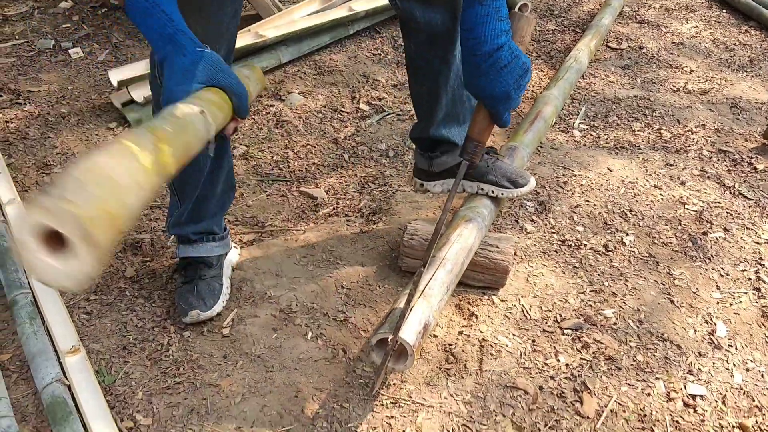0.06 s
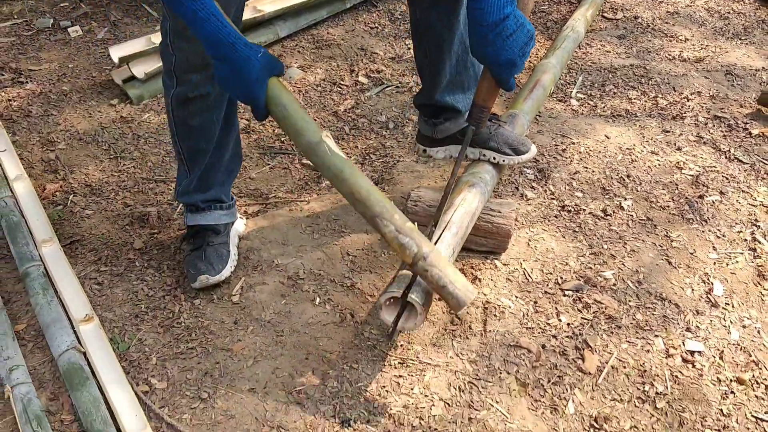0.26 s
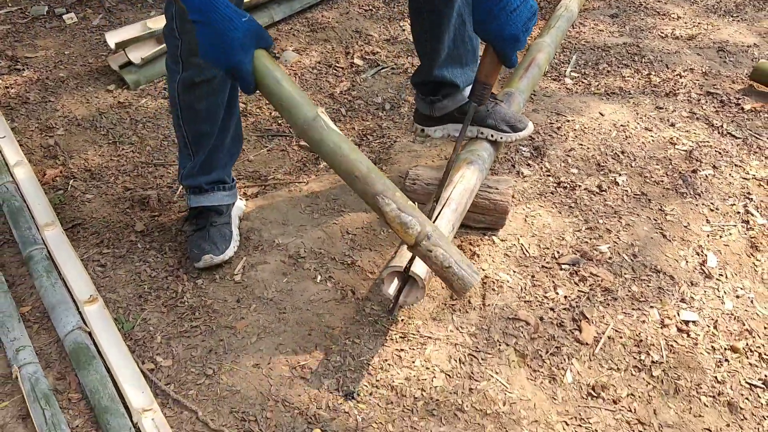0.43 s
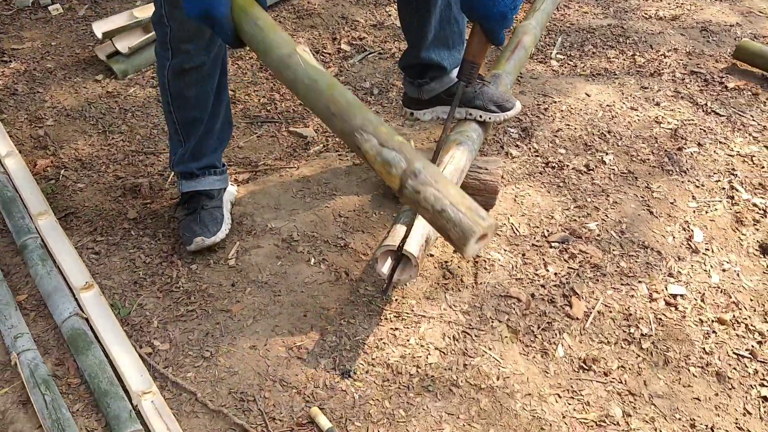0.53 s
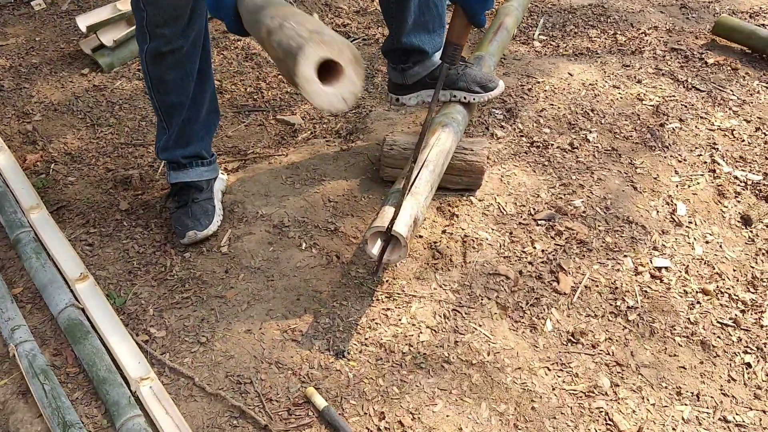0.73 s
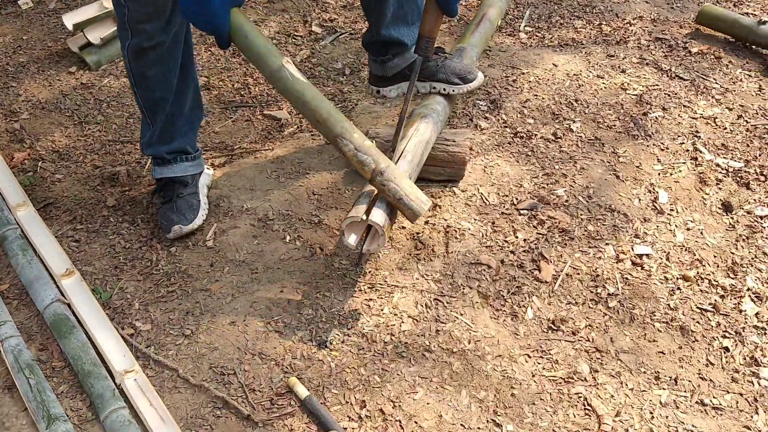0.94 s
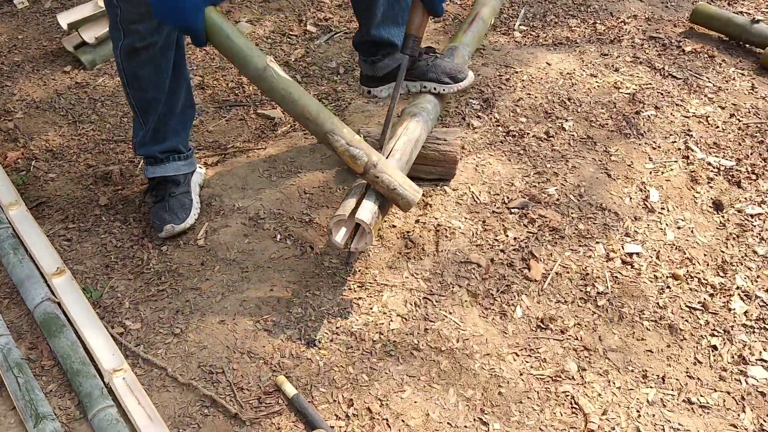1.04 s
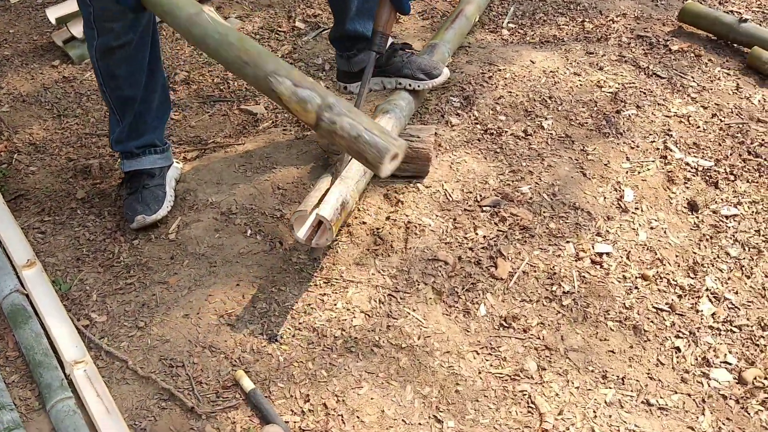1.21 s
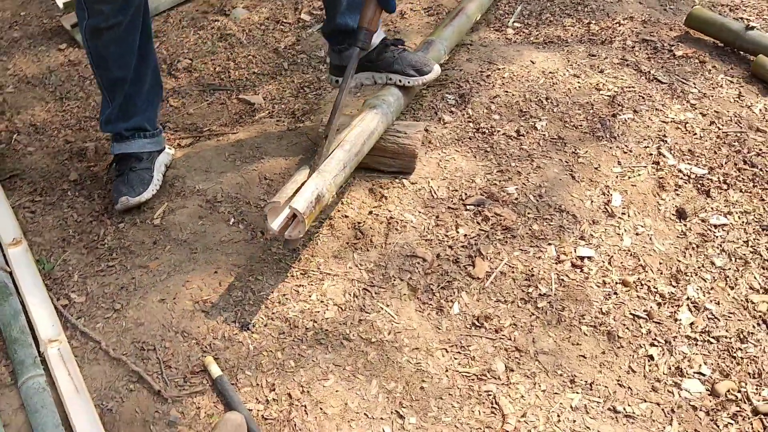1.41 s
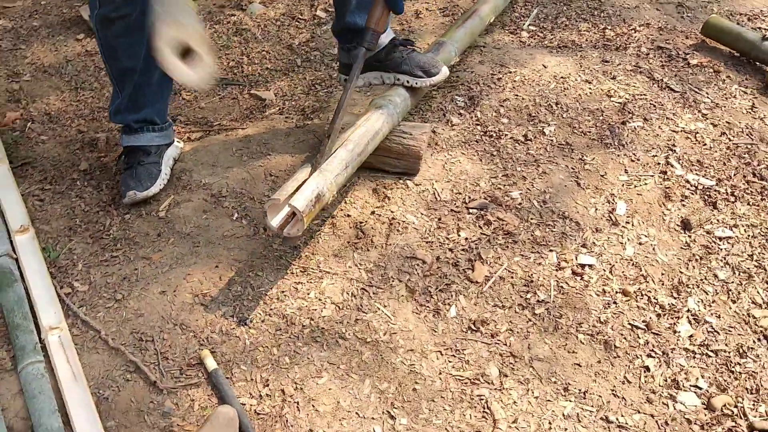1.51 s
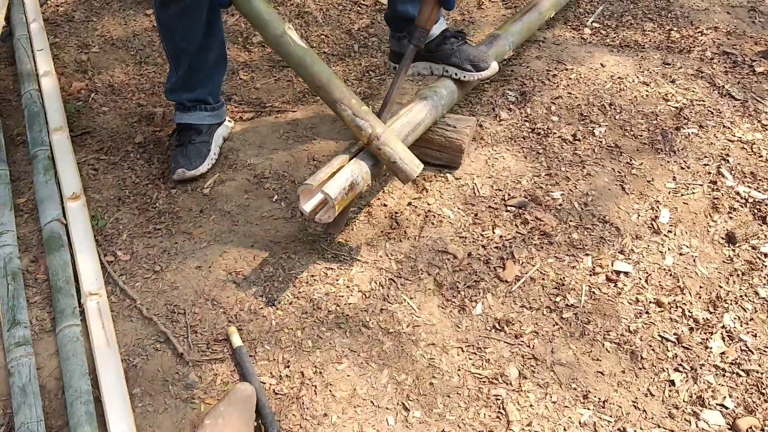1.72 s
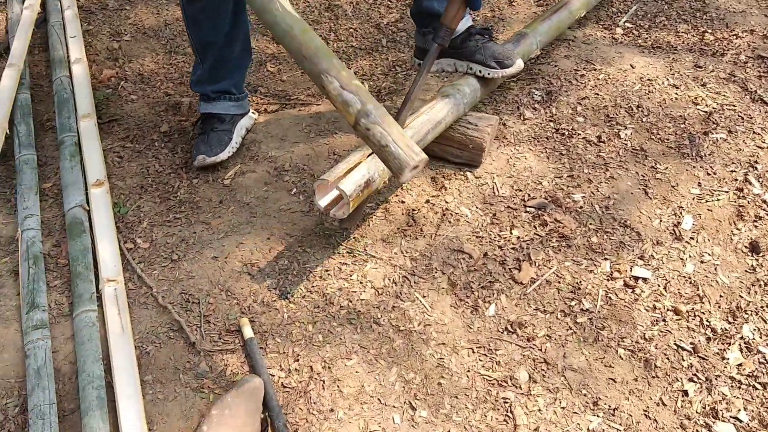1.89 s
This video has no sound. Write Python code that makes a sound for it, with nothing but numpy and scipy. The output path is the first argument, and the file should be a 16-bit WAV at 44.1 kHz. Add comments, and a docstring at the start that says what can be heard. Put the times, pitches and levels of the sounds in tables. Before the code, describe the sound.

Three hard, woody knocks with cracking fibres as bamboo is split outdoors.

```python
"""A bamboo club strikes three times on a blade wedged in a bamboo pole that lies on dry ground.
Each blow cracks the fibres, makes club, blade and pole ring, and thumps the ground; after the first
two the club bounces lightly. The surroundings throw the knocks back. In between, split fibres tick,
the pole bumps and squeaks, and dry litter rustles over quiet outdoor air."""
import sys
import numpy as np
from scipy import signal
from scipy.fft import rfft, irfft, next_fast_len
from scipy.io import wavfile
from scipy.ndimage import map_coordinates

SR = 44100
rng = np.random.default_rng(int(sys.argv[2]) if len(sys.argv) > 2 else 0)


def wav_out(sig):
    """Save sig, one row per channel (or a flat mono array), as 16-bit PCM at SR to the path in sys.argv[1]."""
    wavfile.write(sys.argv[1], SR, np.round(np.clip(np.atleast_2d(sig).T, -1, 1) * 32767).astype(np.int16))


N = 85995

# Levels are relative. A "colour" says how strong each pitch is; t60 is the time to fade by 60 dB.
# colour of the outdoor air: f/Hz, level/dB
AIR_COLOUR = [(25, -18.5), (100, 2), (190, -6.5), (330, 5.5), (900, -6.5), (2000, -3.5), (3200, -9),
              (3900, -3.5), (4700, -9), (6500, -11), (7800, -8.5), (8800, -65), (15000, -25)]
# rustles of dry litter: t/s, half length/s, level/dB, treble over body/dB
RUSTLE_EVENTS = [(.13, 0.074, -67.5, -7), (0.541, 0.014, -56, -6), (0.595, 0.027, -55, -12.5),
                 (0.813, 0.077, -69.5, -9.5), (1.28, 0.095, -62, -9), (1.517, 0.066, -65.5, -3)]
# fibre ticks: t/s, level/dB, treble over body/dB
TICK_EVENTS = [(0.583, -46, -18), (0.589, -48, -3), (0.639, -62.5, 9), (0.658, -43.5, -23),
               (1.2495, -45.5, -5.5), (1.273, -50, -14), (1.376, -54, -0.5), (1.44, -51, -2),
               (1.4503, -56.5, 8.5), (1.454, -67, -6), (1.479, -61, 5), (1.492, -47, -10.5),
               (1.504, -51, -4.5), (1.518, -51.5, -11), (1.52, -47, -16), (1.546, -54, 0), (1.572, -47, -7),
               (1.581, -63, 1)]
# body and treble colours of ticks and rustles: f/Hz, level/dB
DRY_BODY = [(200, -42), (900, -2.5), (2000, -5.5), (3200, 6.5), (3900, -6), (4700, -29.5), (9000, -47)]
DRY_TREBLE = [(3000, -32), (5000, -12), (6400, 0), (7800, -4), (9000, -22), (15000, -50)]
# bumps of the pole on its support: t/s, level/dB, f/Hz, width/Hz, t60/s
POLE_BUMPS = [(0.574, -62, 140, 110, .1), (0.579, -46, 430, 330, .13), (1.264, -59, 140, 110, .06),
              (1.572, -37, 680, 750, .03)]
# colours of the far and near echoes: f/Hz, level/dB
FAR_COLOUR = [(100, -25), (350, 0), (800, 11.5), (1400, -2), (2200, 3.5), (3200, -11), (4500, -15.5),
              (8000, 3)]
NEAR_COLOUR = [(60, -43), (180, -22.5), (330, 1), (520, -1), (900, 0), (1400, -3), (2100, 1.5), (3200, -2),
               (4700, -6), (7000, -2), (10000, 11.5), (15000, -13)]
# club bounces: t/s, rattle level/dB, ring level/dB, ring f/Hz, tube level/dB, tube f/Hz
BOUNCES = [(0.2892, -18.5, -21.5, 2017, -39.5, 425), (0.965, -21, -23, 1378, -32.5, 521)]
# colours of a bounce's rattle, the soil's thump and the cracking fibres: f/Hz, level/dB
RATTLE_COLOUR = [(40, -41), (200, -6), (700, -7), (1500, -12), (2600, -14), (3500, 6.5), (4600, -34),
                 (6700, -9.5), (8500, -28), (15000, -69)]
SOIL_COLOUR = [(25, -25.5), (55, -19), (100, 19), (150, 3.5), (230, -8), (400, -17.5), (900, -19.5),
               (3000, -80)]
CRACK_COLOUR = [(30, -48), (100, -22.5), (270, -9.5), (550, -8.5), (740, -5), (1100, 1.5), (1750, -1),
                (3100, 0), (3900, -8.5), (4700, -10.5), (6400, -5.5), (8000, -12), (10500, -29),
                (15500, -37)]
# low tones of the pole pushed into the ground: f/Hz, t60/s, level/dB
PUSH_TONES = [(91.7, 0.025, -0.5), (144, 0.027, 2.5), (194.7, 0.029, -2.5)]
# long tones of the steel blade: f/Hz, t60/s, level/dB in blow 1, 2, 3
BLADE_TONES = [(1421, 0.85, -40, -42.5, -46), (2010, 0.73, -40.5, -46.5, -52)]
# first snap of the contact: f/Hz, t60/s, level/dB
CLICK_TONES = [(3280, 0.0029, 5), (1430, 0.0018, -0.5), (6140, 0.0036, -4)]
# tones of club, blade and pole, hit on a new spot each time: f/Hz, t60/s, level/dB in blow 1, 2, 3
STRUCK_TONES = [(353, 0.23, -25.5, -36.5, -28.5), (429.4, 0.072, -23.5, -32, -23.5),
                (526.6, 0.19, -39.5, -29.5, -38.5), (599, 0.046, -42.5, -29, -19.5),
                (847.5, 0.05, -32, -25.5, -13), (1037, 0.03, -20.5, -20.5, -18.5),
                (1307, 0.036, -13, -15, -33), (1422.2, 0.06, -8.5, -19, -16),
                (2000, 0.054, -15.5, -14, -16), (2277, 0.016, -13, -40, -15.5),
                (2585, 0.035, -11.5, -23, -17), (3134, 0.058, -12, -39, -22), (3220, 0.015, -30, -31, -40),
                (3870, 0.03, -20.5, -17, -21), (6490, 0.0083, -19, -9, -38)]
# blows: t/s, then level/dB of click, crack, thump, near echo, far echo
CLUB_BLOWS = [(0.2191, 0, -14, -19, 0.5, 2), (0.8935, -1, -13, -26.5, 1.5, -17),
              (1.6122, -1, -10, -18, 0.5, -6)]

TONE_RISE_S, NEAR_RISE_S = 0.00076, 0.008


def amp(db):
    """Turn decibels into a gain."""
    return 10 ** (np.asarray(db) / 20)


def unit(x):
    """Scale x to an average strength (rms) of 1."""
    return x / np.sqrt(np.mean(x ** 2) + 1e-20)


def filtered(x, response):
    """Turn each frequency of x up or down by response(hz)."""
    size = next_fast_len(N + 8192)
    return irfft(rfft(x, size) * response(np.fft.rfftfreq(size, 1 / SR)), size)[:N]


def noise(colour):
    """Noise of strength 1 in the given colour."""
    f, db = np.transpose(colour)
    gain = lambda hz: amp(np.interp(np.log(hz + 1), np.log(f), db))
    return unit(filtered(rng.standard_normal(N), gain))


def narrow_noise(hz, width):
    """Noise around one pitch; width is a share of that frequency."""
    peak = lambda f: (1j * f * hz * width / (hz * hz - f * f + 1j * f * hz * width)) ** 2
    return unit(filtered(rng.standard_normal(N), peak))


def since(s):
    """Seconds since time s, zero before it."""
    return np.maximum(np.arange(N) / SR - s, 0)


def wander(per_s):
    """A smooth random curve with per_s new values a second."""
    return map_coordinates(rng.standard_normal(N // 10), [since(0) * per_s])


def strike(s, rise, t60):
    """A loudness curve that rises at time s and dies away."""
    t = since(s)
    return (1 - np.exp(-t / rise)) * amp(-60 * t / t60)


def swell(s, half):
    """A bell-shaped loudness curve around time s."""
    return np.exp(-.5 * ((np.arange(N) / SR - s) / half) ** 2)


def ring(s, hz, rise, t60):
    """One pure tone that starts at time s and fades."""
    return np.sin(2 * np.pi * hz * since(s)) * strike(s, rise, t60)


def outdoor_air():
    """A very quiet, steady rush."""
    return amp(-69.5) * noise(AIR_COLOUR)


def litter_rustles():
    """Dry litter rustles in soft, slightly grainy swells."""
    grains = unit(amp(0.5 * wander(per_s=1200)))
    body, treble = noise(DRY_BODY), noise(DRY_TREBLE)
    return grains * sum(amp(db) * (body + amp(treble_db) * treble) * swell(s, half)
                        for s, half, db, treble_db in RUSTLE_EVENTS)


def fibre_ticks():
    """Split fibres tick in tiny bursts of noise."""
    body, treble = noise(DRY_BODY), noise(DRY_TREBLE)
    return sum(amp(db) * (body + amp(treble_db) * treble) * strike(s, rise=0.00049, t60=0.022)
               for s, db, treble_db in TICK_EVENTS)


def pole_noises():
    """The pole bumps softly on its support and gives one faint squeak."""
    bumps = sum(amp(db) * narrow_noise(hz, width / hz) * strike(s, rise=0.0042, t60=t60)
                for s, db, hz, width, t60 in POLE_BUMPS)
    squeak = amp(-60) * narrow_noise(hz=3000, width=0.09) * swell(0.728, half=0.047)
    return bumps + squeak


def reflected(x, colour, envelope):
    """Smear x into many tiny echoes; the highest treble dies first."""
    echoes = noise(colour)
    low = filtered(echoes, lambda hz: 1 / (1 + (hz / 7900) ** 20))
    treble = (echoes - low) * amp(-60 * since(0) / 0.34)
    response = envelope * (low + treble)
    return signal.fftconvolve(x, response / np.linalg.norm(response))[:N]


def far_echo(x):
    """Distant things send back a blurred echo, starting 0.34 s later."""
    return reflected(x, FAR_COLOUR, strike(0.34, rise=0.11, t60=0.57))


def near_echo(x):
    """Nearby things answer evenly for 0.15 s, then fade into a faint, long tail."""
    early = (1 - np.exp(-since(0) / NEAR_RISE_S)) * amp(-60 * since(0.15) / 0.42)
    tail = amp(-8.5) * strike(0, NEAR_RISE_S, t60=1.6)
    return amp(-18.5) * reflected(x, NEAR_COLOUR, np.hypot(early, tail))


def club_bounce(s, rattle_db, ring_db, ring_hz, tube_db, tube_hz):
    """The club touches again: a short rattle, one tone and the rough, hollow note of air in the tube."""
    rattle = noise(RATTLE_COLOUR) * strike(s, rise=0.00081, t60=0.019)
    tone = ring(s, ring_hz, rise=0.00081, t60=0.039)
    roughness = amp(0.5) * narrow_noise(tube_hz, width=0.32)
    tube = (np.sin(2 * np.pi * tube_hz * since(s)) + roughness) * strike(s, rise=0.0092, t60=0.36)
    return amp(rattle_db) * rattle + amp(ring_db) * tone + amp(tube_db) * tube


def ground_thump(s):
    """The pole is pushed into the soil: low tones and a dull burst of noise."""
    push = sum(amp(db) * ring(s + 0.003, hz, rise=0.006, t60=t60) for hz, t60, db in PUSH_TONES)
    soil = noise(SOIL_COLOUR) * strike(s, rise=0.007, t60=0.061)
    return amp(9.5) * push + amp(-2.5) * soil


def blade_ring(index, s):
    """The steel blade rings on faintly, wavering a little."""
    out = 0
    for hz, t60, *levels in BLADE_TONES:
        phase = 2 * np.pi * hz * since(s) + wander(per_s=15)
        out += amp(levels[index]) * np.sin(phase) * strike(s, TONE_RISE_S, t60)
    return out


def fibre_crack(s):
    """Bamboo fibres crack sharply, then splinter more quietly for longer."""
    fibres = noise(CRACK_COLOUR)
    crack = fibres * strike(s, rise=0.0012, t60=0.03)
    duller = filtered(fibres, lambda hz: 1 / (1 + (hz / 10000) ** 8))
    splinters = duller * strike(s, rise=0.0012, t60=0.26)
    return crack + amp(-16.5) * splinters


def club_blow(index, s, click_db, crack_db, thump_db):
    """The club lands: a hard snap, the ring of club, blade and pole, a crack and a thump."""
    click = -sum(amp(db) * ring(s, hz, rise=0.00015, t60=t60) for hz, t60, db in CLICK_TONES)
    tones = sum(amp(levels[index]) * ring(s + rng.uniform(0, 1 / hz), hz, TONE_RISE_S, t60)
                for hz, t60, *levels in STRUCK_TONES)
    return amp(click_db) * click + tones + amp(crack_db) * fibre_crack(s) + amp(thump_db) * ground_thump(s)


def scene():
    """Lay the blows, the bounces and their echoes over the quiet background."""
    out = outdoor_air() + litter_rustles() + fibre_ticks() + pole_noises()
    for index, (s, click_db, crack_db, thump_db, near_db, far_db) in enumerate(CLUB_BLOWS):
        knock = club_blow(index, s, click_db, crack_db, thump_db)
        out += knock + blade_ring(index, s)
        out += amp(near_db) * near_echo(knock) + amp(far_db - 34.5) * far_echo(knock)
    for row in BOUNCES:
        touch = club_bounce(*row)
        out += touch + amp(-6) * near_echo(touch)
    return out[None]


def record(dry):
    """Drop the deepest bass, round off the tallest peaks and cut the highest treble."""
    low_cut_hz, ceiling, top_hz = 118, 1.25, 15800
    lean = signal.sosfilt(signal.butter(2, low_cut_hz, "highpass", fs=SR, output="sos"), dry[0])
    rounded = lean / (1 + np.abs(lean / ceiling) ** 6) ** (1 / 6)
    return filtered(rounded, lambda hz: 1 / np.sqrt(1 + (hz / top_hz) ** 120))[None]


dry = scene()
out = record(dry)
wav_out(out)
```